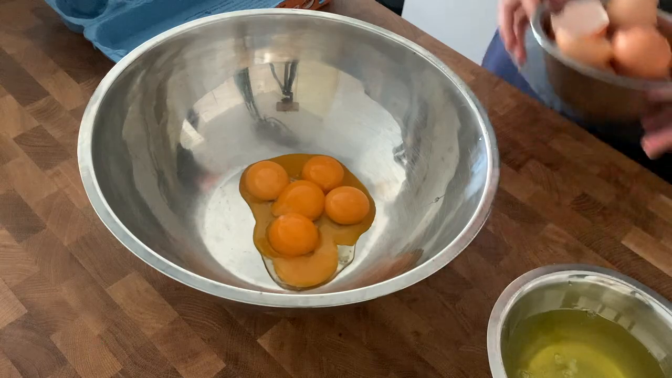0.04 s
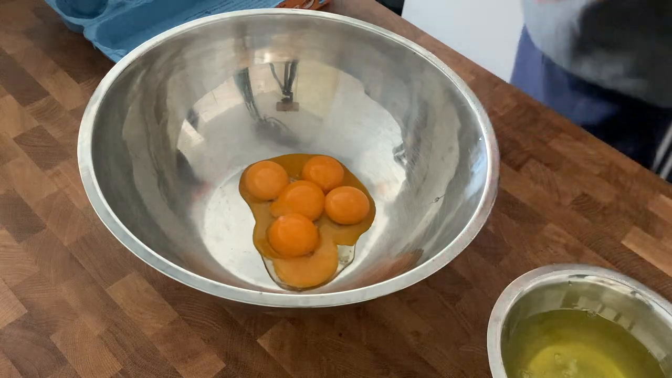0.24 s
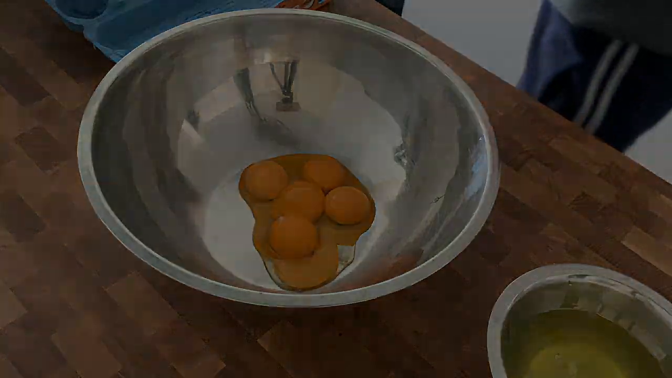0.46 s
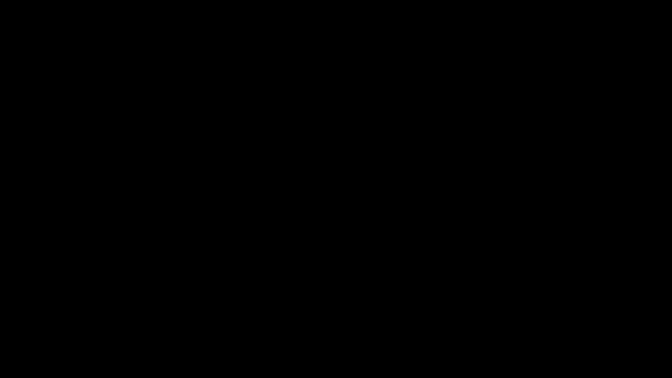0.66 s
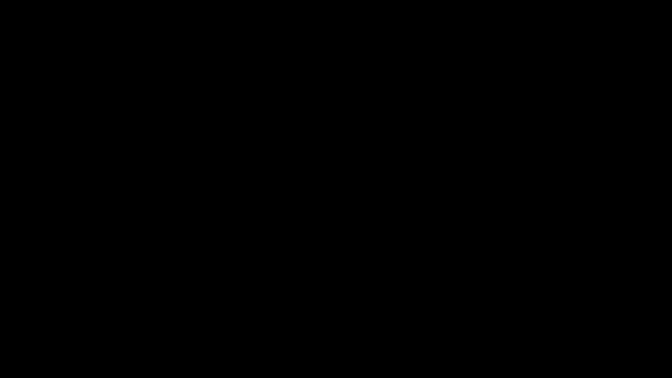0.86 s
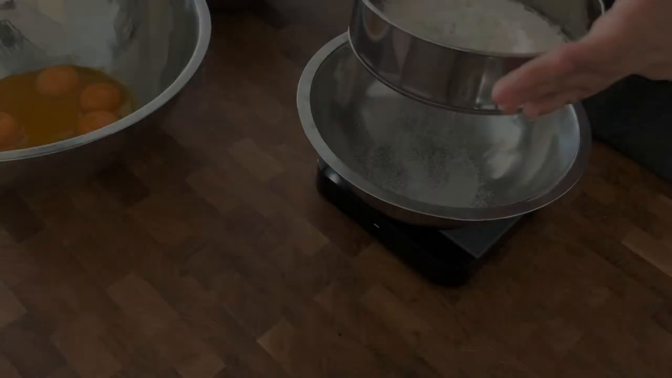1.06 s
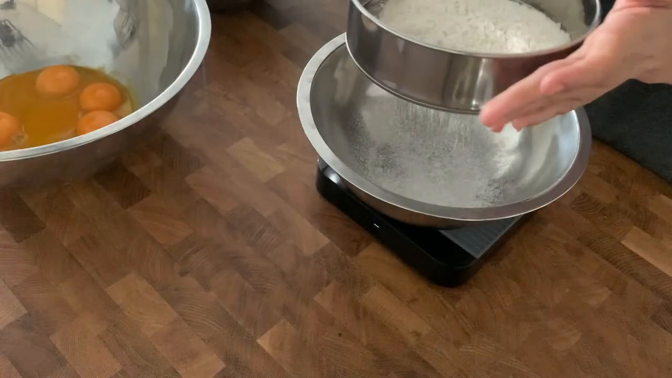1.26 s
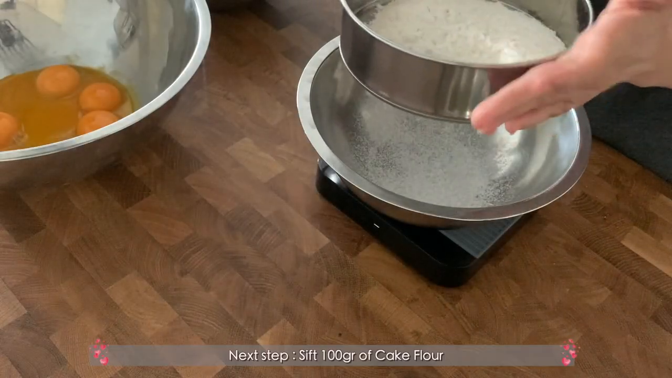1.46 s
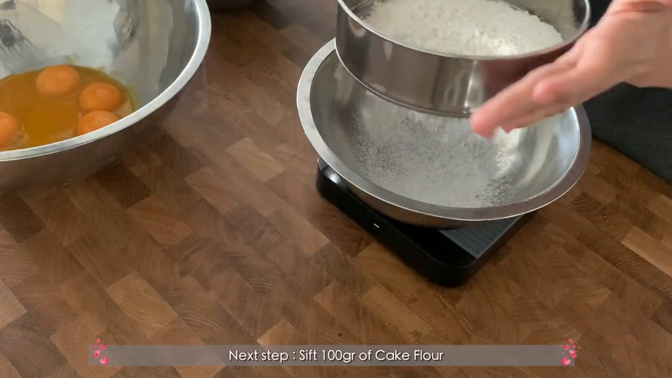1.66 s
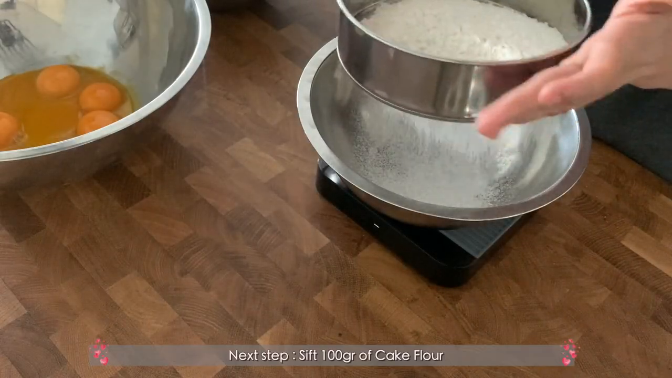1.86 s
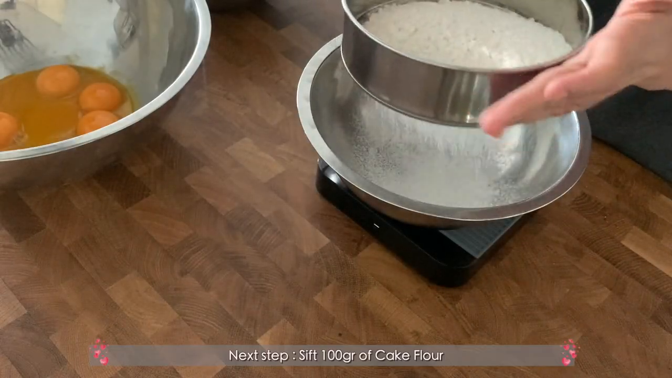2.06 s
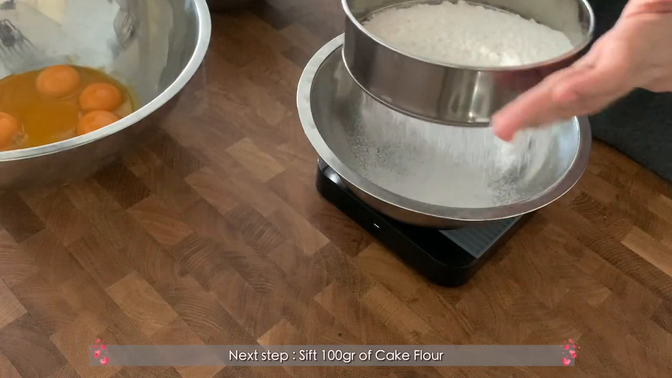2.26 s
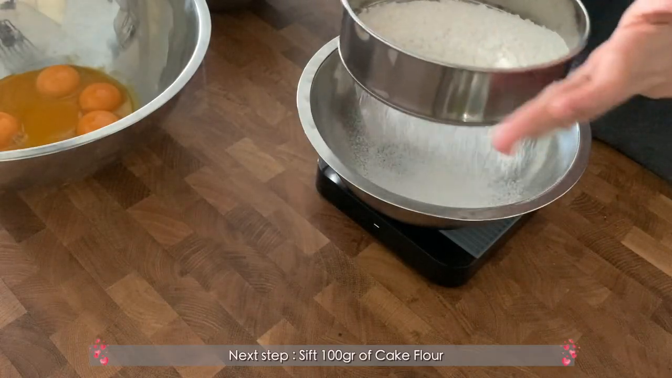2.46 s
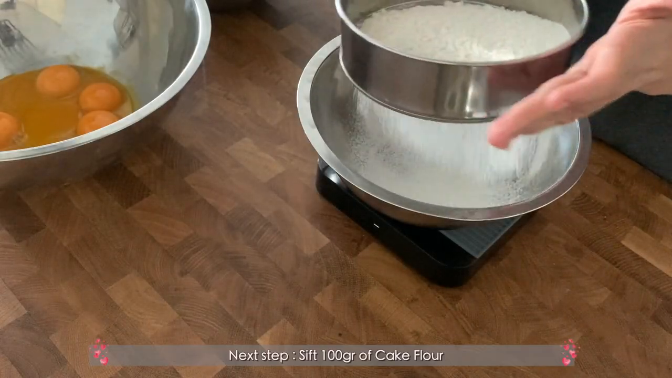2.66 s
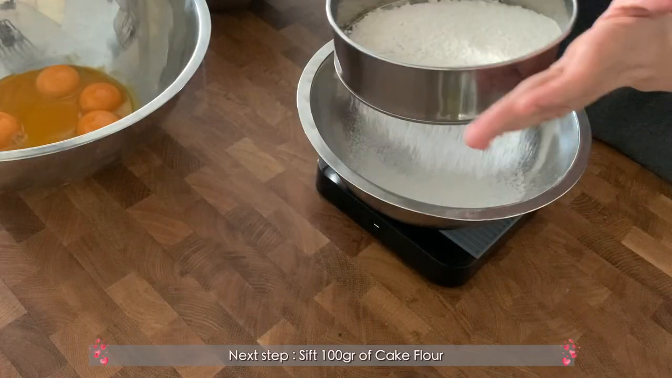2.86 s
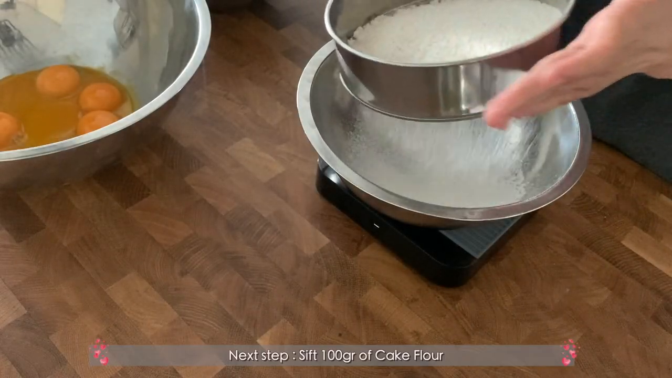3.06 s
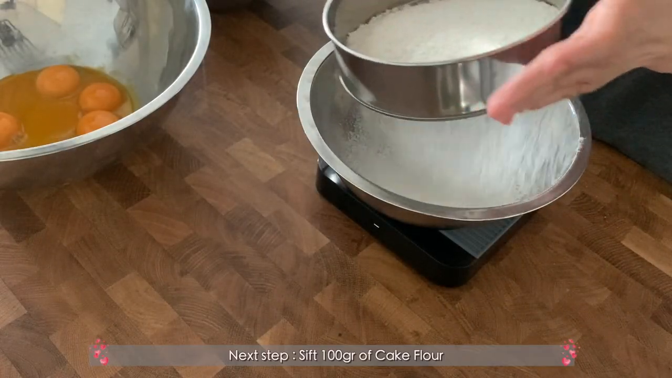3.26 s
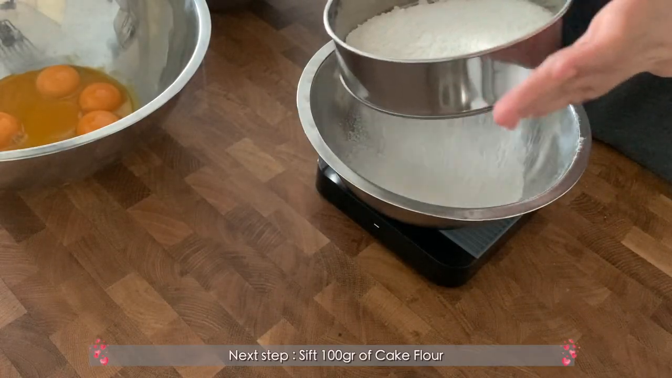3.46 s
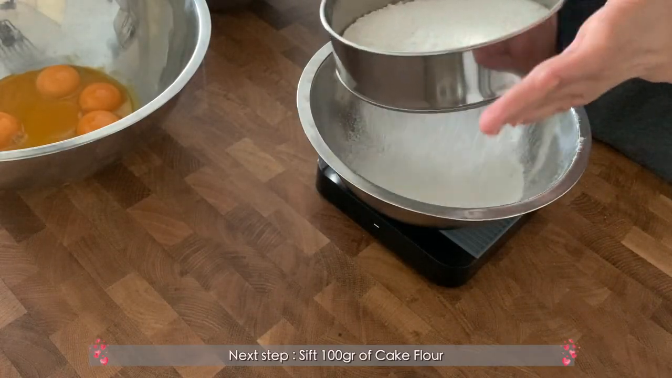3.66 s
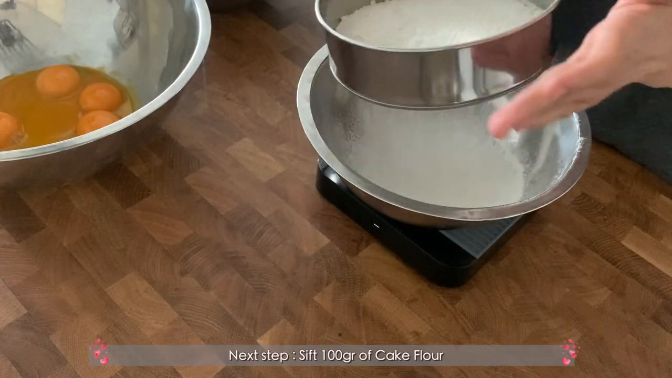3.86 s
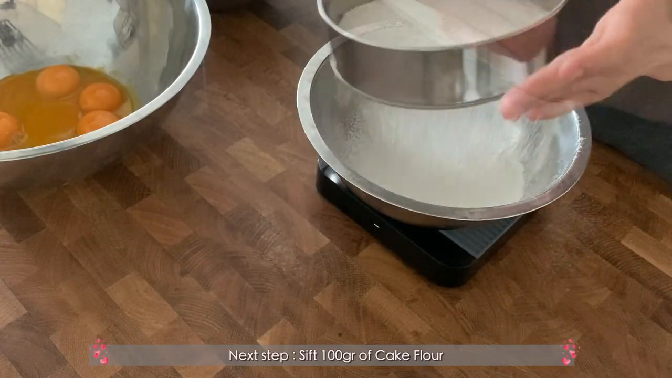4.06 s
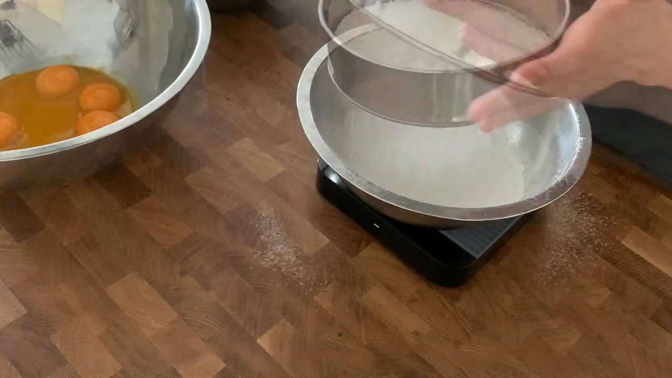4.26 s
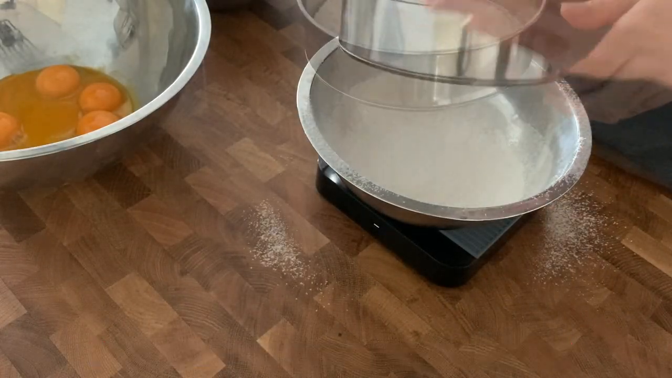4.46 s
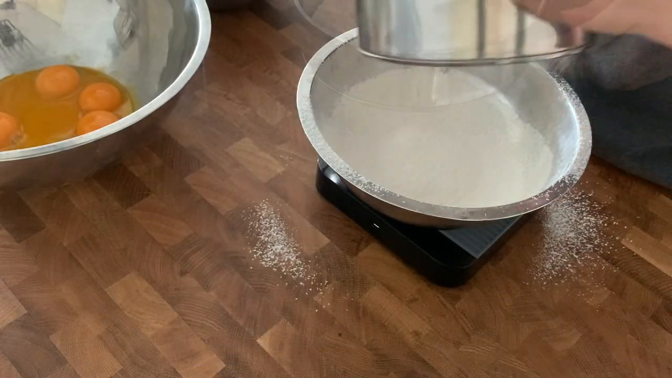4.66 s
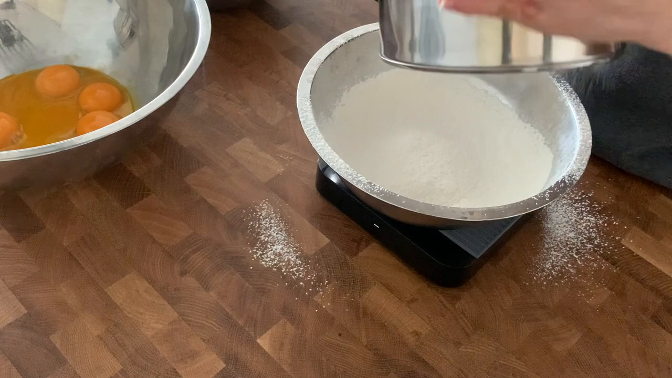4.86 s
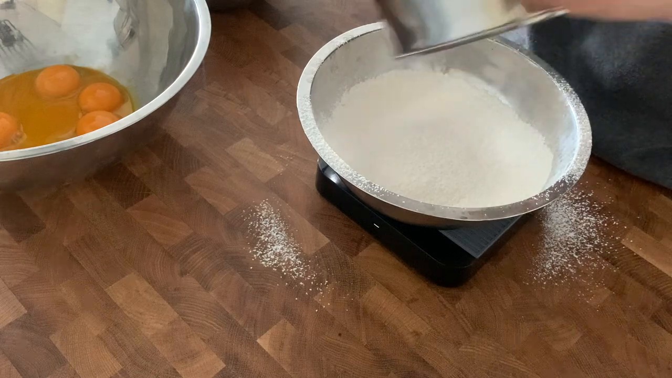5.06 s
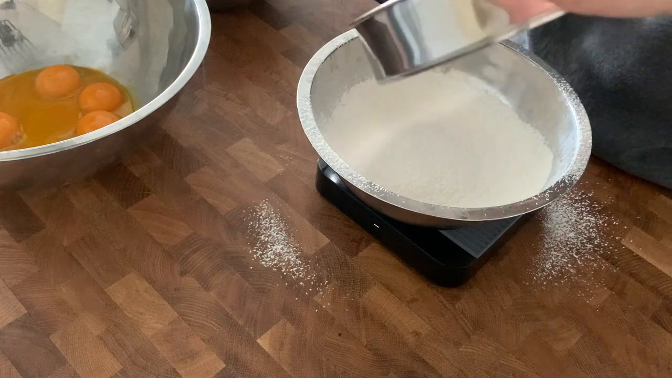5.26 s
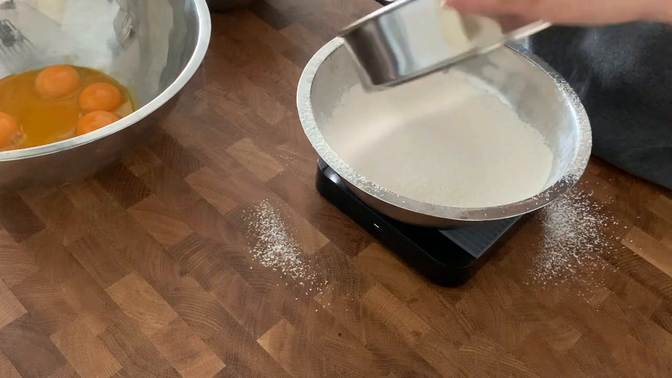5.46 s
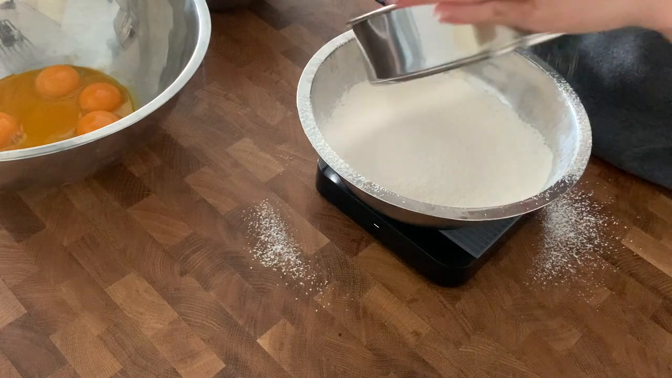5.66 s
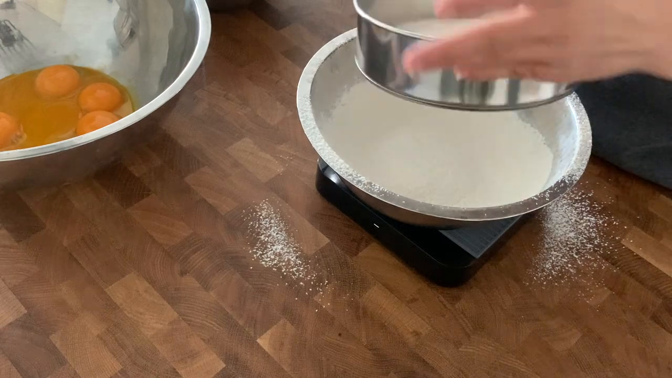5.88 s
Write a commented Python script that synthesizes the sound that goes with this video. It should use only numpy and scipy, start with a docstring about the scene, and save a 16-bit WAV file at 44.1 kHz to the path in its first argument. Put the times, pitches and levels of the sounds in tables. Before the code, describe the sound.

A faint low hum and steady ventilation fill a quiet kitchen throughout. At about 0.4 seconds egg shells shift in a bowl with a small crack and a soft crunch. From 0.8 seconds a hand starts tapping a steel flour sieve, with a soft rustle as the shaking begins. The taps come quickly and a little unevenly, about five strong ones a second, getting slightly denser after 3 seconds. Each makes the loose mesh chatter in its frame with a bright, crisp rattle and small rebounds; some leave the rim ringing briefly. Dull knocks from the hand and flour sit underneath, along with a faint hiss of flour passing through. Around 4.4 seconds the hiss and steady tapping stop. A few lighter, scattered taps follow, roughly every quarter second, until about 5.8 seconds. Everything sounds close, with only a short room reflection.

```python
"""A low hum and ventilation fill a quiet kitchen; egg shells crunch as their bowl is carried off.
Then a hand taps the steel rim of a flour sieve over a bowl. Each tap makes the loose mesh chatter
in its frame; some leave the rim ringing briefly. Flour hisses through the mesh.
The hand, and flour thrown against the rim, add dull knocks."""
import sys
import numpy as np
from scipy import signal
from scipy.fft import rfft, irfft, next_fast_len
from scipy.io import wavfile
from scipy.ndimage import uniform_filter1d

SR = 44100
rng = np.random.default_rng(int(sys.argv[2]) if len(sys.argv) > 2 else 0)


def store_wav(level_fs):
    """Save 16-bit WAV to argv[1]."""
    pcm = np.round(np.clip(np.atleast_2d(level_fs), -1, 1) * 32767)
    wavfile.write(sys.argv[1], SR, pcm.T.astype(np.int16))


N = 260983

# hum envelope: t/s, level/dB
HUM_LEVEL = [(0.0, -70), (0.03, -60), (0.58, -73), (1.0, -54.5), (1.05, -63.5), (1.22, -50), (1.73, -74),
             (2.54, -61.5), (2.6, -114), (2.78, -68), (4.19, -53.5), (4.28, -71.5), (4.37, -62),
             (5.74, -67.5), (5.85, -56), (5.92, -83)]
# ventilation spectrum: f/Hz, density/dB
VENT_SPECTRUM = [(20, -30.5), (32, -17), (45, -2), (62, 0), (95, -7.5), (165, -14), (260, -22), (500, -25),
                 (700, -25.5), (930, -20.5), (1300, -30), (1750, -34.5), (2000, -44.5), (6000, -49),
                 (9000, -44.5), (14000, -53.5), (16600, -67.5)]
# rumble envelope: t/s, level/dB
RUMBLE_LEVEL = [(0.0, -66), (0.64, -80), (1.02, -74.5), (2.41, -82), (3.4, -77), (4.25, -81), (4.61, -71),
                (5.92, -69)]
# rumble spectrum: f/Hz, density/dB
RUMBLE_SPECTRUM = [(80, -29.5), (120, -1.5), (170, 6.5), (220, 0.5), (320, -36.5)]
# shells shifting: t/s, level/dB, t60/s, treble/dB re level
CRUNCHES = [(0.3935, -51, 0.28, .5), (0.5656, -62, 0.23, -27), (0.6644, -65.5, 0.55, -7)]
# crunch body: f/Hz, density/dB
SHELL_SPECTRUM = [(300, -2.5), (800, -4.5), (1500, 0), (2500, -5.5), (4000, -35)]
# crunch treble: f/Hz, density/dB
SHELL_TREBLE_SPECTRUM = [(1500, -20), (2500, 1), (4400, 1.5), (6000, -8), (8000, -11), (11000, -37)]
# taps and rebounds: t/s, mesh level/dB, frame/dB re mesh, after-rattle/dB re contact
SIEVE_TAPS = [(.7932, -46.5, -9, -9), (0.809, -34.5, -6.5, -25.5), (.8465, -34, -17.5, -12),
              (0.867, -42, -2.5, -15), (0.9388, -18, -12.5, -25), (1.024, -29.5, -8.5, -19),
              (1.064, -30.5, -18, -9), (1.0973, -29.5, -8.5, -18), (1.155, -17.5, -14, -19),
              (1.2085, -25, -5, -34), (1.2316, -36, -3, -20.5), (1.3328, -40.5, -6, -24),
              (1.411, -34, -9.5, -20), (1.43, -31, -7, -23), (1.5358, -27, -14, -18),
              (1.594, -38.5, -3.5, -18.5), (1.6049, -29.5, -9.5, -14.5), (1.62, -34, -15, -21),
              (1.7303, -22, -11.5, -20), (1.7783, -36.5, -12.5, -20.5), (1.79, -36, -12.5, -13.5),
              (1.8, -27.5, -3.5, -23.5), (1.811, -28, -8, -31), (1.8266, -33.5, -12.5, -28),
              (1.9356, -40, -12, -7.5), (1.9456, -15.5, -15, -17.5), (1.983, -31, -16.5, -7.5),
              (2.007, -28, -7.5, -24), (2.037, -31.5, -3.5, -27), (2.1397, -18, -15, -17.5),
              (2.174, -30, -22.5, -7.5), (2.185, -33, -19.5, -27), (2.1928, -27.5, -2.5, -34),
              (2.231, -28.5, -15.5, -10), (2.3394, -17.5, -14, -17.5), (2.3797, -34, -8.5, -25),
              (2.39, -27, -5, -24), (2.425, -28, -12, -20), (2.5246, -14, -16.5, -26.5),
              (2.5378, -23.5, -20.5, -13), (2.564, -33, -3, -12.5), (2.5752, -22.5, -13.5, -20),
              (2.6064, -32, -10.5, -17), (2.7036, -48, -13.5, -0.5), (2.721, -18.5, -20, -13.5),
              (2.7484, -30, -14.5, -11), (2.768, -29, -5.5, -18), (2.814, -33.5, -14, -10),
              (2.8695, -20.5, -15, -21.5), (2.9335, -21, -17, -12), (2.962, -26.5, -10.5, -20),
              (3.0308, -38.5, -13, -25), (3.0484, -23.5, -17.5, -18), (3.107, -17, -15.5, -23.5),
              (3.1205, -29, -11.5, -12.5), (3.1363, -36, -7, -15.5), (3.1967, -37, -11.5, -11),
              (3.2625, -21, -15, -10), (3.272, -30.5, -17, -7), (3.2893, -24, -17, -11),
              (3.325, -28, -9, -15), (3.346, -37.5, -9, -34), (3.4246, -16.5, -18, -20.5),
              (3.5021, -15.5, -14.5, -18), (3.523, -28, -6.5, -20.5), (3.531, -35.5, -4, -26.5),
              (3.6372, -16, -15.5, -21.5), (3.7012, -16, -16, -15.5), (3.77, -30.5, -10, -12),
              (3.8144, -18.5, -15.5, -19.5), (3.828, -35, -10, -25), (3.8958, -15, -11.5, -20.5),
              (3.918, -31, -22, -16), (3.933, -39.5, -9, -8), (4.0514, -41, -10.5, -14),
              (4.0705, -17, -11.5, -29), (4.096, -28.5, -17, -11), (4.1346, -30.5, -8, -12),
              (4.157, -27.5, -9, -36), (4.2436, -16.5, -15.5, -21.5), (4.3563, -25.5, -13.5, -24),
              (4.5522, -41.5, -8.5, -8.5), (4.5638, -39.5, 5, -26.5), (4.7984, -33, -7.5, -21),
              (5.0776, -47.5, -2, -13.5), (5.318, -41, -6.5, -16), (5.3262, -39, -13, -19.5),
              (5.514, -70, 1.5, -12), (5.5642, -31.5, -6.5, -19.5), (5.755, -71, 6.5, -12.5),
              (5.799, -57, 5, -18), (5.8036, -40.5, -6, -19)]
# mesh chatter: f/Hz, density/dB
MESH_SPECTRUM = [(3000, -32), (5500, -11.5), (7000, -0.5), (8600, -0.5), (10300, 4), (11400, -5.5),
                 (12700, -9.5), (14000, -15.5), (15500, -24.5), (16600, -35)]
# frame chatter: f/Hz, density/dB
FRAME_SPECTRUM = [(600, -18.5), (1200, -10), (2400, -3), (3500, -0.5), (4700, 3), (6000, -2), (8000, -21)]
# hard first touch: f/Hz, density/dB
TICK_SPECTRUM = [(6000, -21.5), (10000, -7), (12500, 4), (15000, -6.5), (16600, -9.5)]
# short rings of frame and mesh: f/Hz, drive/dB, t60/s
CLINK_MODES = [(1420, -31, .04), (1650, -32, .04), (1940, -32, .04), (2450, -31, .04), (2950, -33, .035),
               (3330, -31, .04), (3480, -30, .05), (4150, -33, .06), (4480, -31, .04), (4660, -31, .035),
               (4900, -33, .035), (5190, -30, .045), (5470, -33, .03), (5980, -30, .035), (6770, -33, .03),
               (7710, -31, .025), (8510, -31, .03), (9380, -31, .035), (9950, -33, .025),
               (10200, -32, .025), (10600, -32, .025)]
# hand and flour hitting the rim: t/s, level/dB, thump/dB re level
KNOCK_HITS = [(0.808, -49.5, -1.5), (1.21, -44, -22), (1.604, -42.5, -22), (1.734, -57, -17),
              (1.803, -50.5, -13), (1.946, -52.5, -19), (1.999, -46.5, -5), (2.006, -40.5, -30.5),
              (2.185, -39, -17.5), (2.193, -52, 7), (2.338, -72, -19), (2.382, -40, -9),
              (2.577, -44.5, -11), (2.766, -54, -14), (2.822, -55, -12), (2.947, -46, -34),
              (2.963, -45.5, -28), (3.137, -46, -4), (3.26, -62.5, -19), (3.327, -46, -8.5),
              (3.43, -50, -12.5), (3.506, -45.5, -10.5), (3.526, -40.5, -3), (3.701, -51, -21.5),
              (3.724, -46.5, -15), (3.781, -50, -16), (3.927, -39.5, -13), (4.053, -48, -16.5),
              (4.128, -38, -8.5), (4.159, -39, -23), (4.246, -52, -28), (4.559, -54.5, 7),
              (4.799, -42.5, -2.5), (5.082, -61, 3), (5.325, -60, 5), (5.566, -46.5, -0.5),
              (5.802, -57, 1.5)]
# dull contact: f/Hz, density/dB
KNOCK_SPECTRUM = [(300, -13.5), (600, -5), (1200, 2), (1900, -2.5), (3000, -11)]
# flour-laden sieve body: f/Hz, drive/dB, t60/s
THUMP_MODES = [(172, 3, 0.045), (276, -1, 0.05), (372, -3, 0.066), (484, -4, 0.077)]
# flour flow envelope: t/s, level/dB
FLOUR_LEVEL = [(0.75, -105), (0.95, -49.5), (1.2, -53), (1.36, -73.5), (1.67, -66), (2.05, -66.5),
               (2.2, -64.5), (3.54, -59.5), (3.77, -57), (4.05, -67), (4.26, -64), (4.4, -95)]
# rustle envelope: t/s, level/dB
RUSTLE_LEVEL = [(0.75, -114), (0.9, -60.5), (1.08, -53), (1.228, -63), (1.66, -66.5), (1.75, -77)]
# rustle spectrum: f/Hz, density/dB
RUSTLE_SPECTRUM = [(150, -7), (400, -3.5), (1000, -10.5), (1700, -4), (2500, -18), (5000, -39)]
# steel hoop modes: f/Hz, t60/s
RIM_MODES = [(3475, .09), (4148, .2)]
# taps that ring the hoop: t/s, lower mode level/dB, upper mode level/dB
RIM_HITS = [(0.9404, -47, -70), (1.0646, -52, -70), (1.156, -49, -44), (1.2088, -70, -51),
            (1.9792, -51, -70), (2.176, -45, -70), (2.2325, -47, -70), (2.3403, -44, -70),
            (2.4249, -46, -70), (2.5632, -48, -70), (2.7499, -47, -54), (2.8706, -50, -70),
            (3.4268, -70, -43), (3.5235, -49, -70), (3.6386, -70, -43), (3.7021, -70, -46),
            (3.8156, -45, -70), (3.8972, -70, -51), (4.0716, -50, -70), (4.2449, -70, -49)]
# sound reaching only one microphone port: f/Hz, power share/0-1
UNSHARED = [(30, .05), (60, .06), (150, .25), (330, .68), (700, .95), (1200, .9), (3000, .88), (5500, .85),
            (7000, .35), (9000, .18), (11600, .05), (13500, .25), (16000, .3)]
# right port response: f/Hz, gain/dB
RIGHT_EQ = [(2500, 0), (4500, 1), (6200, 5.5), (7000, 0)]

N_FFT = next_fast_len(N)
BIN_HZ = np.fft.rfftfreq(N_FFT, 1 / SR)


def amp(db):
    """Decibels to gain."""
    return 10 ** (np.asarray(db) / 20)


def unit_rms(x):
    """Scale to rms 1."""
    return x / np.sqrt(np.mean(x ** 2) + 1e-20)


def envelope(rows):
    """Gain from t/s, level/dB rows; silent outside them."""
    t_s, db = np.transpose(rows)
    return amp(np.interp(np.arange(N) / SR, t_s, db, left=-140, right=-140))


def at_bins(rows):
    """Table interpolated over log frequency at each FFT bin."""
    f_hz, values = np.transpose(rows)
    return np.interp(np.log(np.maximum(BIN_HZ, 1)), np.log(f_hz), values)


def grains(spectrum, grit_db):
    """Two independent streams of tiny uneven impacts, coloured; rms 1."""
    size = amp(grit_db * np.minimum(rng.exponential(1, N), 5))
    impacts = size * rng.standard_normal((2, N))
    coloured = rfft(impacts, N_FFT) * amp(at_bins(spectrum))
    return unit_rms(irfft(coloured, N_FFT)[:, :N])


def clumps(corner_hz, spread_db):
    """Randomly wandering gain, rms 1."""
    pole = np.exp(-2 * np.pi * corner_hz / SR)
    wander = signal.lfilter([1], [1, -2 * pole, pole * pole], rng.standard_normal(N))
    return unit_rms(amp(spread_db * np.clip(unit_rms(wander), -3, 2.5)))


def bursts(t_s, db, t60_s, rise_s):
    """Envelope that swells and decays at each time; powers add."""
    power, age_s = np.zeros(N), np.arange(SR // 2) / SR
    attack = 1 - np.exp(-(age_s / rise_s) ** 2)
    for start_s, level_db, fall_s in zip(t_s, db, np.broadcast_to(t60_s, len(t_s))):
        i = round(start_s * SR)
        shape = attack * amp(level_db - 60 * age_s / fall_s)
        power[i:i + len(age_s)] += shape[:N - i] ** 2
    return np.sqrt(power)


def ring(drive, f_hz, t60_s):
    """One damped mode."""
    r, w = amp(-60 / (t60_s * SR)), 2 * np.pi * f_hz / SR
    return signal.lfilter([0, np.sin(w)], [1, -2 * r * np.cos(w), r * r], drive + 1e-18)


def struck(t_s, db, f_hz, t60_s, p_in_phase):
    """A mode struck 1.8 ms after each time; the second channel's sign is random."""
    signs = np.stack([np.ones(len(t_s)), np.where(rng.random(len(t_s)) < p_in_phase, 1, -1)])
    clicks = np.zeros((2, N))
    clicks[:, np.round((t_s + .0018) * SR).astype(int)] = amp(db) * signs
    return ring(clicks, f_hz, t60_s)


def hum(f_hz=76.2, t60_s=0.86):
    """Low wavering drone: noise twice through one resonance."""
    narrow = ring(ring(rng.standard_normal(N), f_hz, t60_s), f_hz, t60_s)
    even = narrow / np.sqrt(uniform_filter1d(narrow ** 2, size=SR // 12) + 1e-9)
    return envelope(HUM_LEVEL) * clumps(corner_hz=4.9, spread_db=3.0) * even


def ventilation(level_db=-59.5):
    """Steady, bass-heavy air noise."""
    return amp(level_db) * grains(VENT_SPECTRUM, grit_db=3.0)


def rumble():
    """Faint noise band near 170 Hz, drifting in level."""
    return envelope(RUMBLE_LEVEL) * grains(RUMBLE_SPECTRUM, grit_db=0.1)


def egg_shells():
    """Shells shift in their bowl: a firm crack, then a soft crunch."""
    t_s, db, t60_s, treble_db = np.transpose(CRUNCHES)
    body = bursts(t_s, db, t60_s, rise_s=0.0038) * grains(SHELL_SPECTRUM, grit_db=3.0)
    crack = bursts(t_s, db + 2, t60_s=0.016, rise_s=0.0013) * grains(KNOCK_SPECTRUM, grit_db=-0.5)
    treble_gain = bursts(t_s, db + treble_db, 1.12 * t60_s, rise_s=0.012)
    return body + crack + treble_gain * grains(SHELL_TREBLE_SPECTRUM, grit_db=4.5)


def sieve_chatter(contact_t60_s=0.016, rattle_t60_s=0.17, direct_db=2, tick_db=-16):
    """Loose mesh and frame collide, rattle on and excite their short rings."""
    t_s, mesh_db, frame_re_mesh_db, rattle_db = np.transpose(SIEVE_TAPS)
    frame_db = mesh_db + frame_re_mesh_db
    slips = clumps(corner_hz=78, spread_db=4.0)
    mesh = bursts(t_s, mesh_db, contact_t60_s, rise_s=0.0021)
    mesh += slips * bursts(t_s, mesh_db + rattle_db, rattle_t60_s, rise_s=0.0049)
    frame = bursts(t_s, frame_db, contact_t60_s, rise_s=0.0027)
    frame += slips * bursts(t_s, frame_db + rattle_db + 5, rattle_t60_s, rise_s=0.0016)
    chatter = mesh * grains(MESH_SPECTRUM, grit_db=0.5) + frame * grains(FRAME_SPECTRUM, grit_db=3.0)
    tick = bursts(t_s, mesh_db + tick_db, t60_s=0.024, rise_s=0.0006)
    sound = amp(direct_db) * chatter + tick * grains(TICK_SPECTRUM, grit_db=5.5)
    tap_index = np.searchsorted(t_s, np.arange(N) / SR)
    for f_hz, drive_db, t60_s in CLINK_MODES:
        coupling = rng.uniform(-.7, .7, len(t_s) + 1)   # new strength and sign per tap
        sound += ring(chatter * coupling[tap_index] * amp(drive_db), f_hz, t60_s)
    return sound


def knocks():
    """Hand and flour hit the rim: a dull knock over a thump, its modes mixed anew per hit."""
    t_s, db, thump_db = np.transpose(KNOCK_HITS)
    thump = 0
    for f_hz, drive_db, t60_s in THUMP_MODES:
        mix_db = rng.uniform(-8, 0, len(t_s))
        thump += struck(t_s, db + thump_db + drive_db + mix_db, f_hz, t60_s, p_in_phase=0.63)
    soft_thump = signal.sosfilt(signal.butter(2, 600, fs=SR, output="sos"), thump)
    knock = bursts(t_s, db, t60_s=0.031, rise_s=0.001) * grains(KNOCK_SPECTRUM, grit_db=2.0)
    return knock + soft_thump


def flour():
    """Flour hisses through, coloured by mesh and frame."""
    hiss = grains(MESH_SPECTRUM, grit_db=-1.5) + 0.92 * grains(FRAME_SPECTRUM, grit_db=-2.0)
    return envelope(FLOUR_LEVEL) * hiss


def rustle():
    """Soft broad rustle as the shaking starts."""
    return envelope(RUSTLE_LEVEL) * grains(RUSTLE_SPECTRUM, grit_db=5.0)


def rim():
    """The tapped steel hoop rings in two clear modes."""
    t_s, *mode_db = np.transpose(RIM_HITS)
    return sum(struck(t_s, db, f_hz, t60_s, p_in_phase=0.76)
               for (f_hz, t60_s), db in zip(RIM_MODES, mode_db))


def kitchen_reverb(x, t60_s=0.28):
    """Diffuse reflections: convolution with dull, decaying noise."""
    t_s = np.arange(SR // 2) / SR
    tail = rng.standard_normal((2, len(t_s))) * amp(-60 * t_s / t60_s) * (t_s > .004)
    tail = signal.lfilter([.45], [1, -.55], tail)   # low-pass
    tail /= np.sqrt(np.sum(tail ** 2, axis=1, keepdims=True))
    return signal.fftconvolve(x, tail, axes=1)[:, :N]


def scene():
    """Two channels of the same events; only the impacts reverberate."""
    beds = flour() + rustle() + rumble()
    impacts = sieve_chatter() + rim() + knocks() + egg_shells()
    return beds + impacts + amp(-10) * kitchen_reverb(impacts) + ventilation() + hum()


def record(dry):
    """Two microphone ports, alike in bass and treble, apart in the mids; the top is cut."""
    left_lag_s, cutoff_hz = .000214, 16640
    first, second = rfft(dry, N_FFT)
    unshared = at_bins(UNSHARED)
    right = (np.sqrt(1 - unshared) * first + np.sqrt(unshared) * second) * amp(at_bins(RIGHT_EQ))
    lag_cycles = np.maximum(BIN_HZ * left_lag_s - 1, 0)   # above 4.7 kHz only
    left = first * np.exp(-2j * np.pi * lag_cycles)
    stereo = irfft(np.array([left, right]), N_FFT)[:, :N]
    return signal.sosfilt(signal.cheby2(24, 60, cutoff_hz, fs=SR, output="sos"), stereo)


dry = scene()
out = record(dry)
store_wav(out)
```